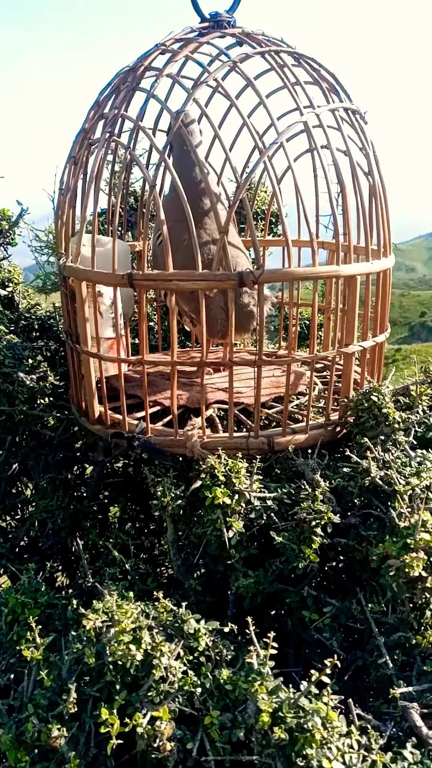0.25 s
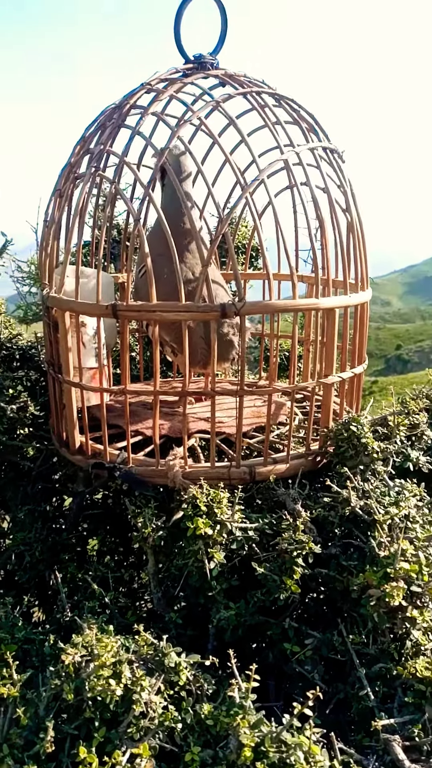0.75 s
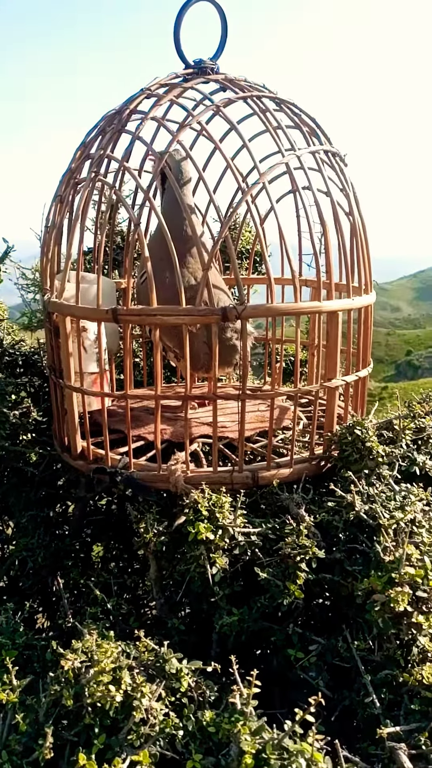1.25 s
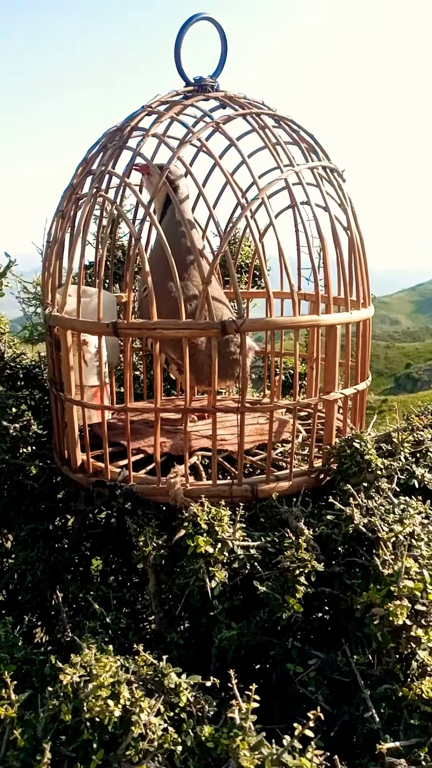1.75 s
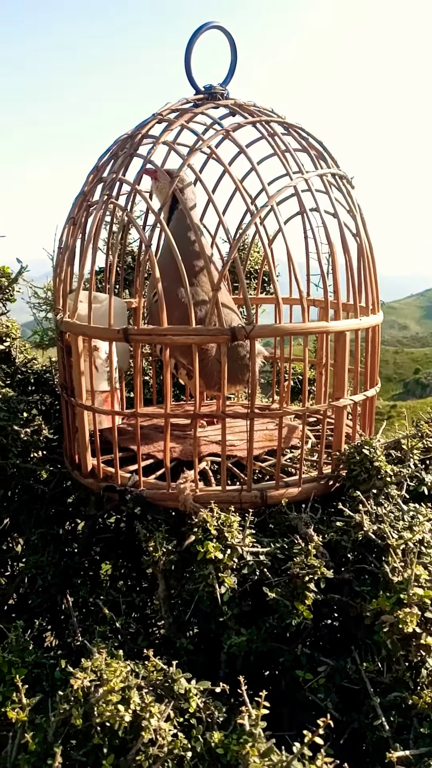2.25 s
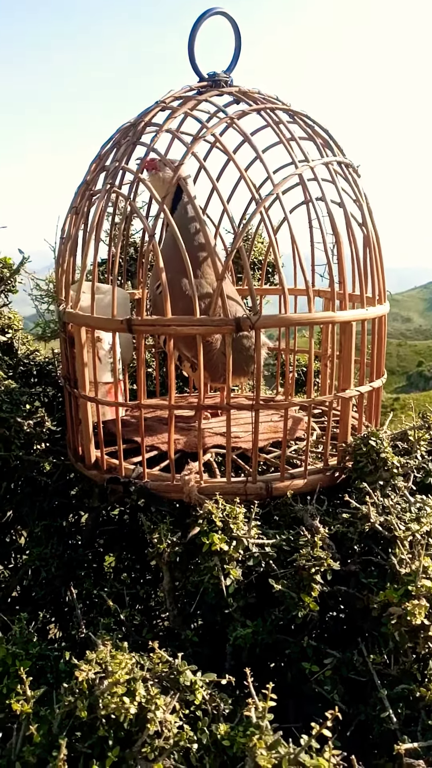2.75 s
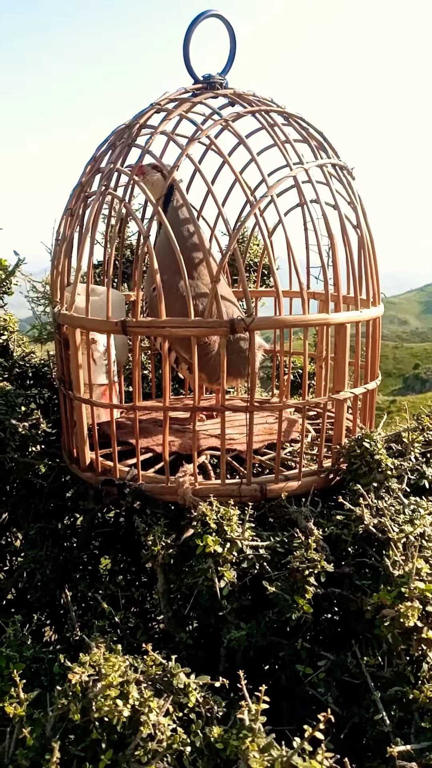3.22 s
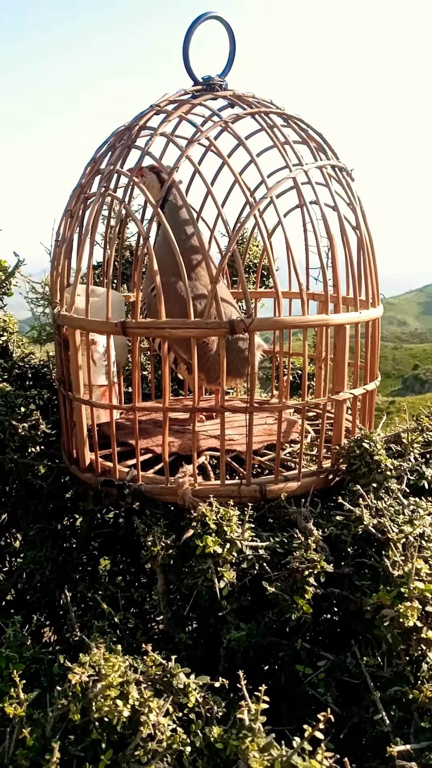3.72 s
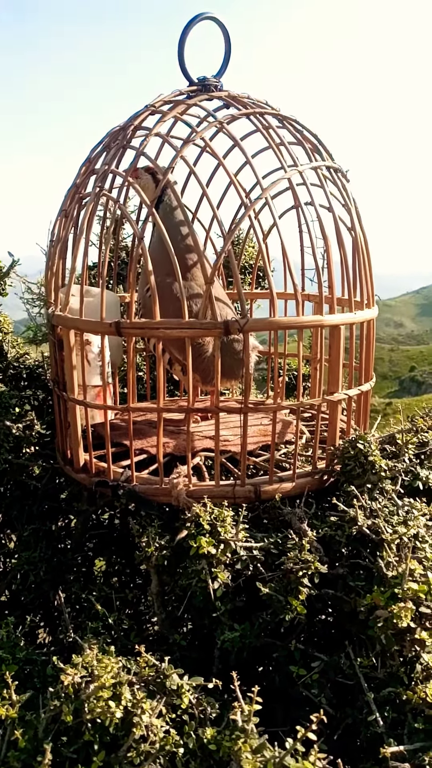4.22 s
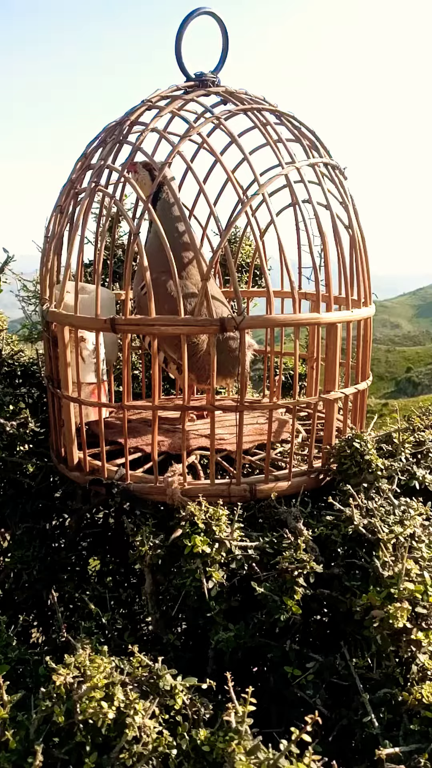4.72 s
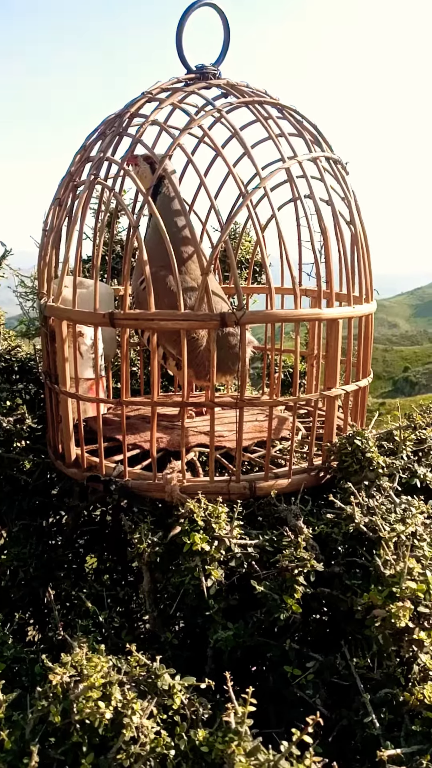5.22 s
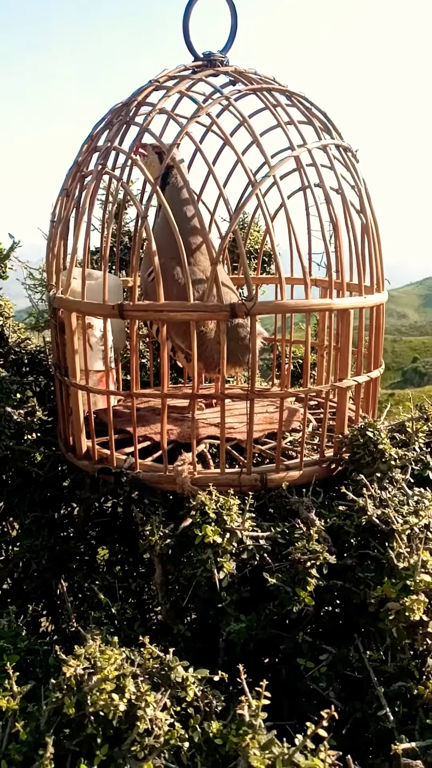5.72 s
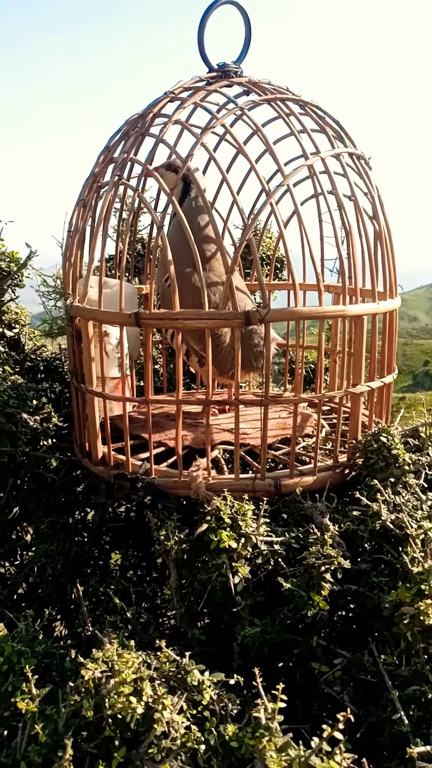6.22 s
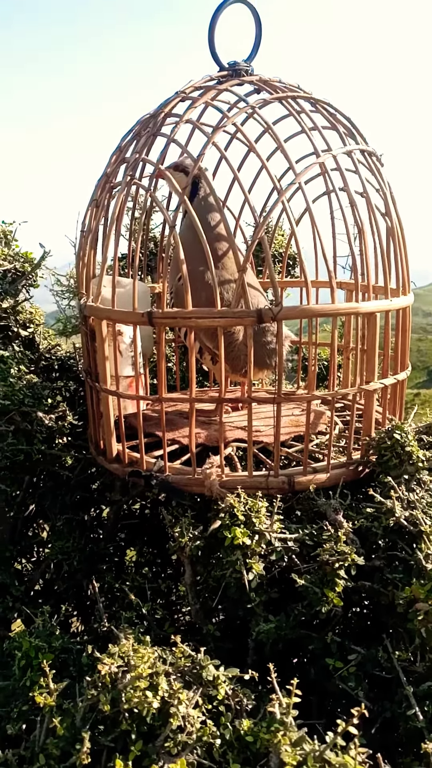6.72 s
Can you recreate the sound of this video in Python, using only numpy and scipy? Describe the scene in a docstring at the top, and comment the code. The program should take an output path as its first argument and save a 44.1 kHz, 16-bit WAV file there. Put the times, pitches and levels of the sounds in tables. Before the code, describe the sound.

From 0.1 seconds a partridge, close to the microphone, calls in a brisk, regular pattern of three very short notes: a raspy chuk, a clearer, slightly more ringing note, then another clipped hoarse one. Each note drops in pitch and closes abruptly; a group comes about every 0.44 seconds, thirteen in all, with little change in loudness. A faint diffuse echo from bushes and hillside fills the gaps. Dull wind thuds bump the microphone, most noticeable near 0.45, 1.8 to 2.4 seconds, then weaker. Tiny distant peeps occur around 0.45 and 1.8. Light wicker taps come at 0.6, 2.0 and 4.5 to 4.7, with a small knock and creak near 4.85. Calling ends at about 5.75; a clearer cage knock with a brief scrape follows at 5.8. The last second holds low wind, faint hiss and barely audible far peeps from 6.5 onward.

```python
"""A partridge in a wicker cage on an open hillside calls in groups of three: a hoarse chuk, a clearer note,
a short hoarse one. Membrane pulses and breath noise pass through resonances that change as the beak closes.
Knocks and slips ring the cage as damped modes; the slope returns a soft echo as decaying bands of noise.
Small birds peep far off as gliding sines; shaped noise makes wind thuds on the microphone and a faint hiss."""
import sys
import numpy as np
from scipy import signal
from scipy.fft import rfft, irfft
from scipy.io import wavfile
from scipy.ndimage import uniform_filter1d

SR = 44100
rng = np.random.default_rng(int(sys.argv[2]) if len(sys.argv) > 2 else 0)


def to_wav(sig):
    """Store sig (one row per channel, or 1-D mono) as 16-bit WAV at the path in sys.argv[1].

    Samples outside -1..1 are clipped; the rate is SR.
    """
    pcm = np.clip(np.atleast_2d(sig), -1, 1) * 32767
    pcm = np.round(pcm).astype(np.int16)
    wavfile.write(sys.argv[1], SR, pcm.T)  # frames by channels


N = 306936
T = np.arange(N) / SR

# The partridge's notes, three to a group: (start [s], length [s], nominal level [dB],
# highest pitch [Hz], lowest pitch [Hz], basic roughness [0-1])
NOTES = [(0.091, 0.056, -21.5, 571.2, 403, 0.75), (0.253, 0.063, -20.5, 595.5, 498.2, 0.26),
         (0.351, 0.04, -20, 581.4, 419, 0.76), (0.526, 0.059, -21.5, 571.8, 398.4, 0.72),
         (0.689, 0.052, -20.5, 605.3, 487.9, 0.31), (0.79, 0.051, -20.5, 582.6, 420.0, 0.63),
         (0.971, 0.054, -22, 572.8, 397.7, 0.77), (1.13, 0.082, -23, 598.8, 529.9, 0.43),
         (1.225, 0.046, -22.5, 585, 420.7, 0.72), (1.404, 0.056, -21.5, 572.3, 401.4, 0.86),
         (1.563, 0.05, -21.5, 595.4, 485.3, 0.27), (1.661, 0.046, -20.5, 580.0, 420.4, 0.65),
         (1.843, 0.057, -22.5, 570.7, 396.7, 0.87), (2.002, 0.051, -21, 597, 485.0, 0.22),
         (2.102, 0.049, -22, 579.8, 421.3, 0.68), (2.284, 0.054, -23, 567.7, 399.2, 0.81),
         (2.442, 0.063, -22.5, 587, 512.9, 0.36), (2.542, 0.044, -21.5, 584, 417.8, 0.72),
         (2.727, 0.055, -22.5, 569, 399.6, 0.83), (2.888, 0.054, -22, 595.5, 500.0, 0.17),
         (2.988, 0.047, -21, 581, 420.4, 0.68), (3.171, 0.053, -23, 564, 400.6, 0.77),
         (3.33, 0.055, -21, 592.6, 499.7, 0.35), (3.431, 0.042, -20.5, 581.2, 415.9, 0.72),
         (3.617, 0.054, -21, 570.0, 400.0, 0.84), (3.78, 0.053, -22, 594.5, 489.2, 0.18),
         (3.88, 0.049, -22.5, 586, 418.4, 0.72), (4.07, 0.055, -22.5, 569, 400.0, 0.74),
         (4.232, 0.055, -22.5, 581, 482.5, 0.41), (4.331, 0.05, -22, 579.4, 420.0, 0.72),
         (4.522, 0.051, -22, 568.2, 403, 0.69), (4.686, 0.053, -22, 573.8, 490.0, 0.3),
         (4.788, 0.052, -21.5, 577.6, 420.0, 0.72), (4.982, 0.057, -23, 570.5, 402.8, 0.85),
         (5.144, 0.049, -21.5, 582.7, 482.9, 0.26), (5.244, 0.054, -22, 578.6, 419.5, 0.71),
         (5.439, 0.05, -23, 567.3, 401, 0.85), (5.601, 0.05, -21.0, 585.4, 470.0, 0.19),
         (5.703, 0.052, -21, 580.0, 421, 0.76)]


def from_db(db):
    """Amplitude gain is the antilogarithm of a twentieth of the decibels."""
    return 10 ** (np.asarray(db) / 20)


def rms_one(x):
    """Normalise the mean power: scale to unit rms."""
    return x / np.sqrt(np.mean(x ** 2) + 1e-20)


def drift(rate):
    """Low-passed noise: a random wander of spread 1, about rate turns a second."""
    pole = np.exp(-2 * np.pi * rate / SR)
    settle = 9000  # samples discarded while the filter settles
    wander = signal.lfilter([1], [1, -2 * pole, pole * pole], rng.standard_normal(N + settle))
    return rms_one(wander[settle:])


def colour(x, spectrum, size=8192):
    """Minimum-phase filtering: folding the cepstrum gives a causal response to the spectrum (Hz, dB)."""
    hz, db = np.transpose(spectrum)
    grid = np.maximum(np.arange(size // 2 + 1) * SR / size, 1)
    gain = from_db(np.interp(np.log(grid), np.log(hz), db))
    cepstrum = irfft(np.log(gain))
    cepstrum[1:size // 2] *= 2
    cepstrum[size // 2 + 1:] = 0
    response = irfft(np.exp(rfft(cepstrum)))
    return signal.fftconvolve(x, response)[:N]


def along(places, columns):
    """Linear interpolation joins values given at shares of each note into one curve in time."""
    notes = np.array(NOTES)
    times = notes[:, :1] + notes[:, 1:2] * places
    return np.interp(T, times.ravel(), columns.ravel())


def chirp(start, length, from_hz, to_hz, db, skew):
    """Linear frequency glide: a sine of quadratic phase; skew over 1 puts its swell late."""
    u = np.clip((T - start) / length, 0, 1)
    swell = np.sin(np.pi * u ** skew)
    cycles = length * (from_hz * u + (to_hz - from_hz) * u * u / 2)
    return from_db(db) * swell * np.sin(2 * np.pi * cycles)


def partridge():
    """Source and filter: membrane pulses, unsteady and breathy when rough, excite windpipe and beak."""
    # windpipe and beak, wide open and closing: (frequency [Hz], relative gain [dB])
    open_tract = [(300, -57.5), (560, -31), (800, -24.5), (1150, -10.5), (1430, -10.5), (1720, 7),
                  (1970, -16.5), (2230, -3.5), (2900, -7), (3550, -43), (4300, -16.5), (5000, -30.5),
                  (5500, -27.5), (6300, -46), (6900, -41.5), (7500, -56), (8300, -62), (9400, -52.5),
                  (10500, -60), (11100, -47), (12100, -66), (13200, -58), (16000, -57)]
    closing_tract = [(250, -43.5), (400, -20), (800, -28.5), (1300, -3.5), (1580, 7.5), (1950, -13),
                     (2500, -13), (3000, -27.5), (3500, -42), (4300, -21.5), (5600, -49), (7000, -56.5),
                     (16000, -71.5)]
    # resonance strengths as the head turns and the neck stretches:
    # (time [s], first [dB], second [dB], third [dB], fourth [dB], fifth [dB])
    head_turns = [(0.1, -1, -20.5, 11, -14, -5), (.6, -3.5, -4.5, 8, -7.5, -4),
                  (.75, -2.2, 1.5, -4.5, -13.5, -1), (1.4, 1.6, -8.5, 9.5, -10, 2.5),
                  (2.101, -0.4, 1.5, -4.5, 5, 1.7), (2.8, 1.5, -2, 2.2, 4.6, 7),
                  (3.599, -1.2, 4.5, -6, 7.5, 3.5), (4.3, -1.4, 4, -7.2, 7, 4),
                  (5.1, 0.8, 3.5, -8.1, 9.2, -0.5), (5.7, -0.1, 3, -10.2, 7.8, 2.1)]
    # strengths added by place in the group: (first [dB], second [dB], third [dB], fourth [dB], fifth [dB])
    upper_by_place = [(2.5, 2, 2, -2.5, -0.3), (1.1, -0.5, -3.5, -1.5, 2.5), (-3, 1.5, -9, -.5, -0.1)]
    flutter_db = 1.5  # random unevenness of the breath, most in rough notes
    slide_s, slide_from_hz, slide_to_hz, slide_db = .008, 3100, 2500, -32

    notes = np.array(NOTES)
    pitch, rough, level_db = note_shapes(notes)
    rough = np.clip(rough, 0, 1) ** 1.6
    pitch = pitch * (1 + .12 * rough * drift(200))  # uneven cycles
    phase = 2 * np.pi * np.cumsum(pitch) / SR

    # the phases of the harmonics lag more with the square of their number
    pulses = rms_one(sum(np.cos(k * phase - 0.3147 * k * k) for k in range(1, 14)))
    pulses = pulses * from_db(2.5 * rough * drift(400))  # uneven strength
    puffs = rng.standard_normal(N) * (1 + 0.77 * np.cos(phase))  # a puff of noise each cycle
    hiss = signal.sosfilt(signal.butter(2, 6500, "high", fs=SR, output="sos"), puffs)
    source = pulses + (0.037 + 2.2 * rough) * puffs + hiss

    closing = along((0, .45, .95), np.tile([0, 0, 1.], (len(notes), 1)))
    opened_voice = rms_one(colour(source, open_tract))
    closing_voice = rms_one(colour(source, closing_tract))
    voice = (1 - closing) * opened_voice + closing * closing_voice

    turn_s, *turn_db = np.transpose(head_turns)
    turned_db = np.transpose([np.interp(notes[:, 0], turn_s, db) for db in turn_db])
    place = np.arange(len(notes)) % 3
    voice = upper_resonances(voice, turned_db + np.array(upper_by_place)[place])

    # each note opens mostly on the third harmonic, the bare ring of the windpipe
    opening = along((0, .18, 1), np.tile([.85, 0, 0], (len(notes), 1)))
    voice = (1 - opening) * voice + opening * 1.4 * np.cos(3 * phase)

    # even out the running power, so that the level curve alone sets the loudness
    power = uniform_filter1d(uniform_filter1d(voice ** 2, size=200), size=200)
    voice = voice / np.sqrt(np.abs(power) + 1e-6)
    calls = voice * from_db(level_db + flutter_db * np.sqrt(rough) * drift(60))

    # a thin whistle slides into every third note, centred on its start
    for start in notes[2::3, 0]:
        calls = calls + chirp(start - slide_s / 2, slide_s, slide_from_hz, slide_to_hz, slide_db, skew=2.6)
    return calls


def note_shapes(notes):
    """Modulation: pitch climbs and falls along a bend, roughness varies, level leaps up, sags and is let go."""
    # pitch by place in the group: (climb [s], share missing at the start [0-1], longest fall [s], bend [exponent])
    glides = [(.004, .01, .06, 2.2), (.013, .07, .038, 1.15), (.006, .01, .06, 1.6)]
    # roughness by place in the group: (added at the start [0-1], added by the end [0-1])
    hoarse = [(-.3, .05), (.3, .3), (-.3, .12)]
    # by place in the group, over which the start's roughness wears off: (share of the note [0-1])
    clearing = [(.45,), (.25,), (.45,)]
    # level by place in the group: (attack [s], loudest at share of the note [0-1],
    # depth below the loudest at the start [dB], sag by the end [dB], bend of the sag [exponent])
    swells = [(.004, 0.16, 6.5, 12.5, 1.4), (.004, 0.24, 4, 16.5, 2.6), (.007, .2, 2, 16.5, 1.8)]
    loudest_db, onset_db = 1.5, -20  # peak over the nominal level; where the attack starts
    release_s, release_db_per_s = .009, 1500.5
    shares = np.linspace(0, 1, 41)  # places along a note

    def by_place(table):
        """Periodic grouping: repeat a three-row table over all the notes, one column at a time."""
        return np.array(table)[np.arange(len(notes)) % 3].T[:, :, None]

    length, db, high_hz, low_hz, rough = notes[:, 1:].T[:, :, None]
    t = shares * length
    climb, missing, fall, bend = by_place(glides)
    fallen = np.clip((t - climb) / np.minimum(fall, length - climb), 0, 1) ** bend
    pitch = high_hz + (low_hz - high_hz) * fallen
    pitch = pitch * (1 - missing * np.clip(1 - t / climb, 0, 1) ** 2)

    early, late = by_place(hoarse)
    rough = rough + early * np.clip(1 - shares / by_place(clearing)[0], 0, 1)
    rough = rough + late * np.clip(2 * shares - 1, 0, 1)

    attack, top, below_db, sag_db, sag_bend = by_place(swells)
    rise = -below_db * np.clip(1 - shares / top, 0, 1)
    sag = -sag_db * np.clip((shares - top) / (1 - top), 0, 1) ** sag_bend
    level = db + loudest_db + rise + sag + onset_db * np.clip(1 - t / attack, 0, 1) ** 2

    after = release_s / length  # the release as a share of the note
    places = np.hstack([-after / 9, shares + 0 * length, 1 + after, 1 + 1.4 * after])
    let_go = level[:, -1:] - release_db_per_s * release_s
    levels = np.hstack([db - 50, level, let_go, db - 91.5])
    return along(shares, pitch), along(shares, rough), along(places, levels)


def upper_resonances(voice, strengths_db):
    """Band splitting: part the voice at its spectral valleys and weight each upper part note by note."""
    # valleys below each upper resonance: one row of five frequencies [Hz]
    edges_hz = (1970, 3500, 4950, 6300, 8000)
    above = [signal.sosfiltfilt(signal.butter(6, hz, "high", fs=SR, output="sos"), voice) for hz in edges_hz]
    parts = np.array(above) - np.array(above[1:] + [0 * voice])
    gains = [from_db(along((0, 1), np.column_stack([db, db]))) for db in strengths_db.T]
    return voice - above[0] + np.sum(parts * gains, axis=0)


def cage():
    """Impulsive and stick-slip excitation: knocks and short runs of uneven slips ring the wicker."""
    # wicker knocked by the bird: (time [s], rod strike before a 2 dB cut [dB], floor strike [dB])
    knocks = [(0.631, -45, -68.5), (1.958, -44.5, -52), (4.512, -46, -100), (4.649, -43.5, -55.5),
              (4.657, -48, -61), (4.856, -41, -40.5), (5.576, -42, -77.5), (5.822, -35.5, -41)]
    # feet shifting: (start [s], length [s], relative strength of the slips [dB])
    creaks = [(4.844, 0.1, -56), (5.832, 0.047, -63)]
    # modes of the rods and of the floor: (frequency [Hz], relative level [dB], decay by 60 dB [s])
    rod_modes = [(1560, -7.5, 0.017), (1880, -9, .015), (2480, -5, 0.013), (2916, 0, 0.018),
                 (3476, -10.5, 0.015), (4385, -18, 0.011)]
    floor_modes = [(256.6, -2, 0.0077), (350, 0.5, 0.049), (941, -3.5, .05)]

    rods, floor = np.zeros((2, N))
    for s, rods_db, floor_db in knocks:
        rods[round(s * SR)] = from_db(rods_db - 2.0)
        floor[round(s * SR)] = from_db(floor_db)

    pressure = 0
    for s, length, db in creaks:
        pressure = pressure + from_db(db) * np.sin(np.pi * np.clip((T - s) / length, 0, 1)) ** 2
    slips = pressure * (rng.random(N) < 9000 / SR) * rng.standard_normal(N)  # about 9000 slips a second
    rung = ring(rods + 0.67 * slips, rod_modes) + ring(floor + 0.45 * slips, floor_modes)
    # soft contacts have no top, light wicker no bottom
    return signal.sosfilt(signal.butter(6, [180, 4000], "band", fs=SR, output="sos"), rung)


def ring(clicks, modes):
    """Modal superposition: clicks set every damped mode of a body ringing."""
    out = 0
    for hz, db, t60 in modes:
        radius, w = from_db(-60 / (t60 * SR)), 2 * np.pi * hz / SR
        numerator = [0, from_db(db) * np.sin(w)]
        denominator = [1, -2 * radius * np.cos(w), radius * radius]
        out = out + signal.lfilter(numerator, denominator, clicks + 1e-18)
    return out


def slope(x):
    """Diffuse scattering from bushes and hillside: convolution with noise that swells, then dies by band."""
    # echo bands: (low edge [Hz], high edge, raised to 100 Hz above the low one if less [Hz],
    # relative gain [dB], decay by 60 dB [s])
    echo_bands = [(500, 1610, -25, 0.19), (1080, 2200, -41.5, 0.86), (1290, 2200, -36, 0.5),
                  (1740, 2285, -26.5, 0.45), (2050, 1900, -33, .4), (3170, 4600, -35.5, 0.4),
                  (4000, 4500, -28, 0.27), (4700, 9300, -34, .25)]
    swell_s, group_s = 0.12, .44  # rise of the echo; spacing of the three-note groups

    t, tail = T[:SR // 2], 0
    for low_hz, high_hz, db, t60 in echo_bands:
        edges = [low_hz, max(high_hz, low_hz + 100)]
        band_pass = signal.butter(2, edges, "band", fs=SR, output="sos")
        band = signal.sosfilt(band_pass, rng.standard_normal(len(t)))
        shape = (1 - np.exp(-t / swell_s)) * from_db(-60 * t / t60)
        tail = tail + from_db(db) * band * shape / np.sqrt(np.sum(shape ** 2))
    # the bird was already calling: the opening, played once ahead, stands for an earlier group still echoing
    lead = round(group_s * SR)
    return signal.fftconvolve(np.r_[x[:lead], x], tail)[lead:lead + N]


def wind():
    """Turbulent pressure on the microphone port: an uneven low rumble with brighter buffets on top."""
    # rumble, before its unevenness and low cut: (time [s], level [dB])
    rumble_levels = [(0.0, -80), (0.29, -58), (0.54, -50), (0.68, -62.5), (0.89, -70), (1.07, -62.5),
                     (1.49, -65.5), (2.29, -48.5), (2.66, -65), (3.0, -54.5), (4.34, -74.5), (4.69, -70),
                     (5.04, -72), (6.01, -62.5), (6.32, -77.5), (6.96, -61.5)]
    # buffets, before the shared unevenness and low cut: (centre [s], length [s], peak level [dB])
    thuds = [(0.036, 0.045, -46), (0.45, 0.049, -31.5), (0.689, 0.062, -49), (0.903, 0.1, -40.5),
             (1.086, 0.09, -49), (1.215, 0.094, -56), (1.345, 0.13, -54.5), (1.547, 0.053, -62),
             (1.613, 0.053, -49), (1.75, 0.034, -38.5), (1.811, 0.032, -36.5), (1.953, 0.054, -36),
             (2.383, 0.066, -38.5), (2.629, 0.05, -64), (2.708, 0.016, -54.5), (2.83, 0.11, -47),
             (3.104, 0.088, -48.5), (3.286, 0.088, -46), (3.5, 0.096, -54.5), (3.754, 0.061, -44),
             (4.024, 0.1, -53), (4.187, 0.052, -54.5), (4.678, 0.043, -55.5), (5.345, 0.048, -50),
             (5.579, 0.096, -53.5), (5.693, 0.039, -53.3), (6.007, 0.039, -53), (6.077, 0.044, -48.8),
             (6.181, 0.057, -44), (6.454, 0.038, -60.5), (6.621, 0.059, -56), (6.736, 0.058, -58),
             (6.857, 0.04, -66)]
    # spectra of the rumble and of the buffets: (frequency [Hz], relative density [dB per Hz])
    rumble_colour = [(12, -37), (20, -19.5), (75, 11), (119, 1), (168, -11.5), (289, -37), (336, -30.5),
                     (400, -44), (520, -72), (880, -120)]
    thud_colour = [(12, -41), (20, -19), (75, 7), (119, 3.5), (168, -3), (250, -20), (336, -29),
                   (400, -47.5), (520, -68.5), (880, -120)]
    thud_edge_db, lumps_db = 15, 2  # fall at either end of a buffet; unevenness of the rumble
    low_cut_hz = 42

    white = rng.standard_normal(N)
    shared_lumps = from_db(2.0 * drift(13))
    dull, bright = (colour(white, spectrum, size=32768) for spectrum in (rumble_colour, thud_colour))
    # even out the running power, so that the level curves alone set the loudness
    dull, bright = (x / np.sqrt(uniform_filter1d(x ** 2, size=2600) + 1e-9) for x in (dull, bright))
    rumble = from_db(np.interp(T, *np.transpose(rumble_levels)) + lumps_db * drift(11))
    buffets = 0
    for s, length, db in thuds:
        fall = np.minimum((2 * (T - s) / length) ** 2, 20)
        buffets = buffets + from_db(db - thud_edge_db * fall)
    gusts = (rumble * dull + buffets * bright) * shared_lumps
    return signal.sosfilt(signal.butter(2, low_cut_hz, "high", fs=SR, output="sos"), gusts)


def far_birds():
    """Frequency-modulated tones: far peeps glide in pitch while their level wavers."""
    # (start [s], length [s], first pitch [Hz], last pitch [Hz], peak level before the wavering [dB])
    peeps = [(0.41, 0.033, 3300, 3160, -71), (0.487, 0.031, 3100, 3060, -60),
             (1.755, 0.068, 3082, 2680, -68), (6.51, 0.038, 2840, 3120, -80.5),
             (6.84, 0.032, 3250, 3160, -78.5), (6.911, 0.03, 3150, 3000, -73)]
    return sum(chirp(*peep, skew=1) for peep in peeps) * from_db(2.1 * drift(60))


def far_hiss():
    """Stationary noise: a faint steady hiss of the open air, weaker towards the treble."""
    # (frequency [Hz], relative density [dB per Hz])
    hiss_colour = [(150, -36.5), (260, -5), (420, -7.5), (2900, -13.5), (4750, -18), (9750, -28.5),
                   (16000, -38.5)]
    return from_db(-78) * rms_one(colour(rng.standard_normal(N), hiss_colour))


def scene():
    """Superposition: bird and cage with their echo, far birds, wind and air."""
    near = partridge() + cage()
    return (near + slope(near) + far_birds() + wind() + far_hiss())[None]


def record(dry):
    """Saturation and resonance: peaks are rounded, the port lifts the high treble, then the top is cut."""
    # resonance of the microphone port: (frequency [Hz], gain [dB])
    port = [(100, 2.5), (12500, 1.5), (14300, 9.5), (15500, 23.5), (17000, 8.5)]
    ceiling, cutoff_hz = .5, 15950  # amplitude at which peaks round off; 50 dB down from the cutoff upwards
    rounded = ceiling * np.tanh(dry[0] / ceiling)
    top_cut = signal.cheby2(24, 50, cutoff_hz, fs=SR, output="sos")
    return signal.sosfilt(top_cut, colour(rounded, port))[None]


dry = scene()
out = record(dry)
to_wav(out)
```